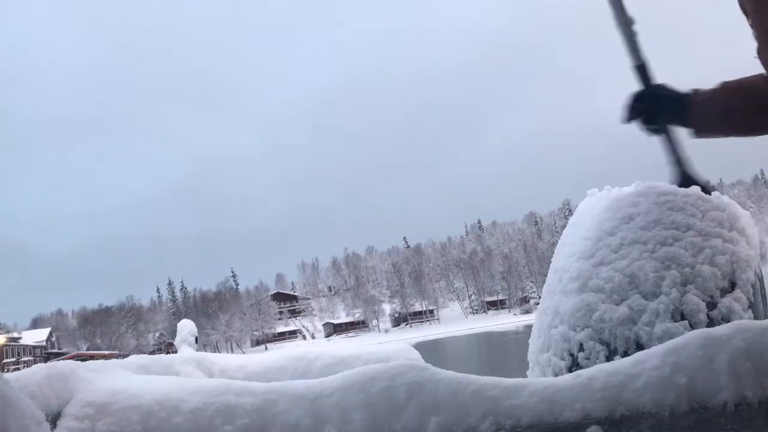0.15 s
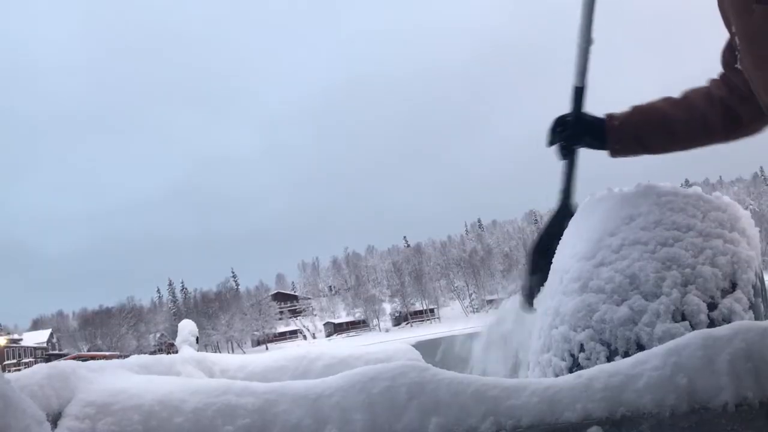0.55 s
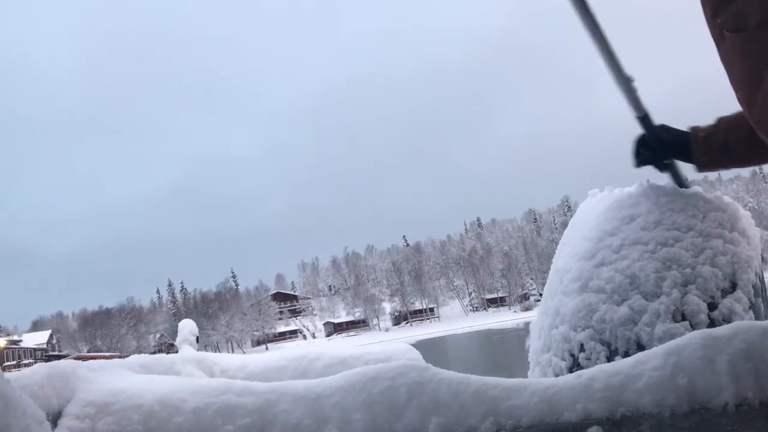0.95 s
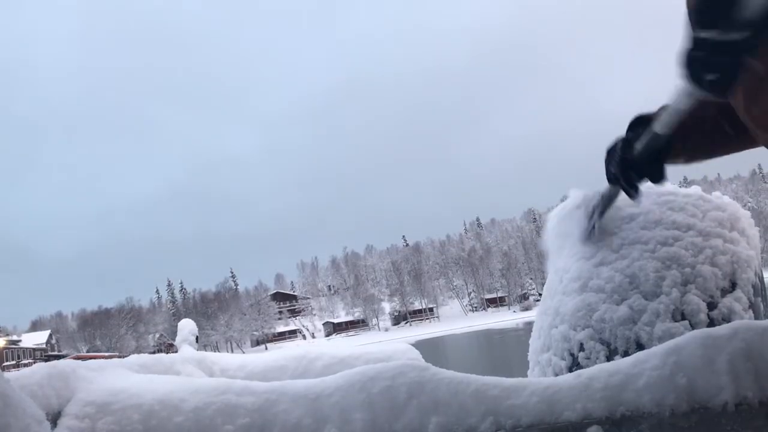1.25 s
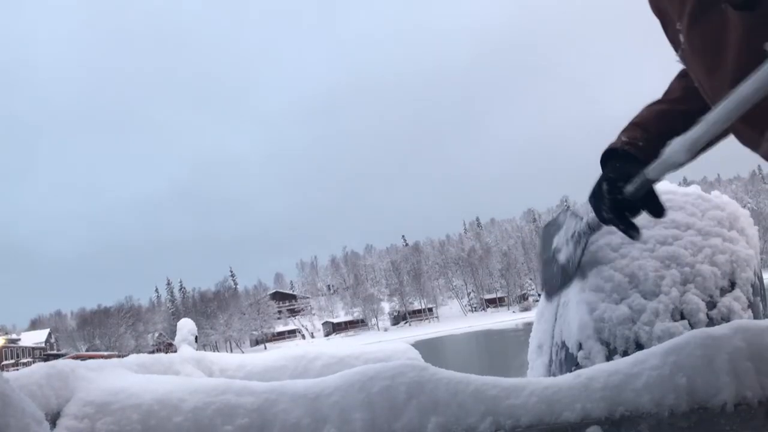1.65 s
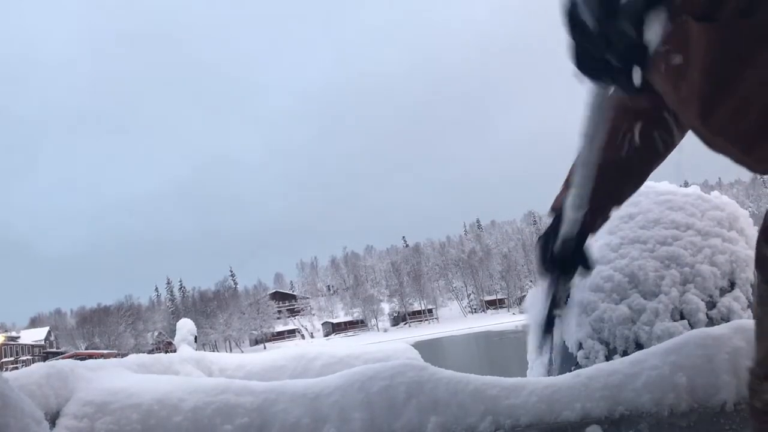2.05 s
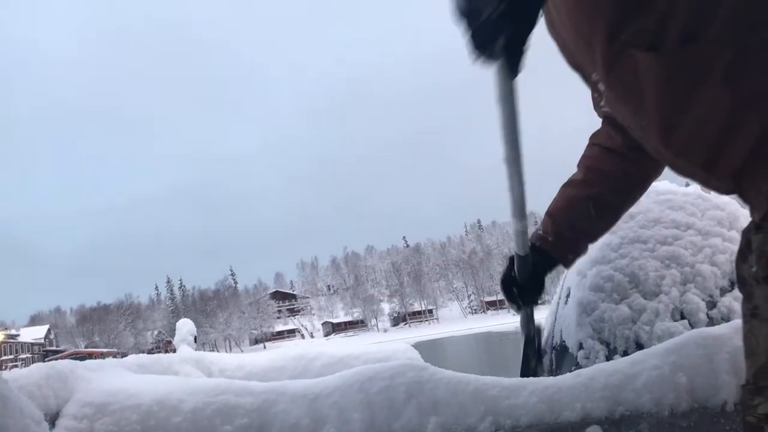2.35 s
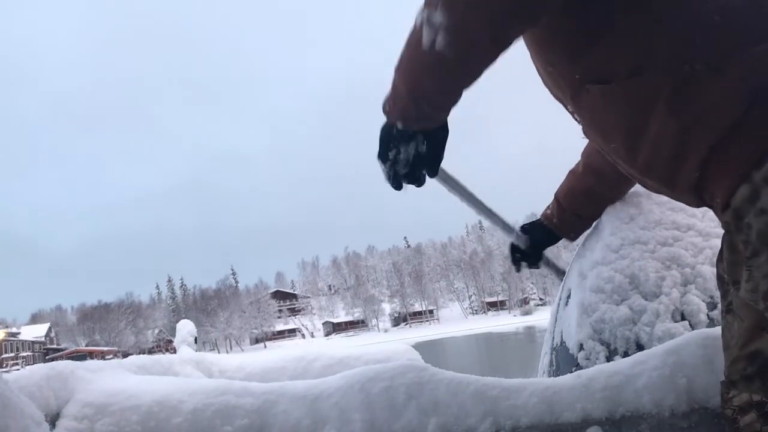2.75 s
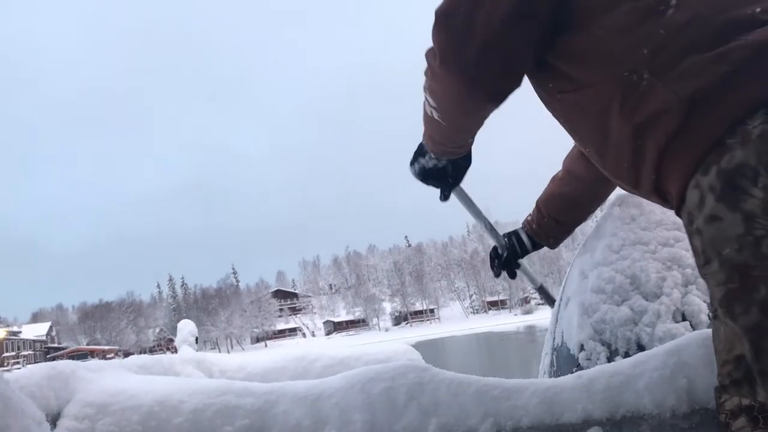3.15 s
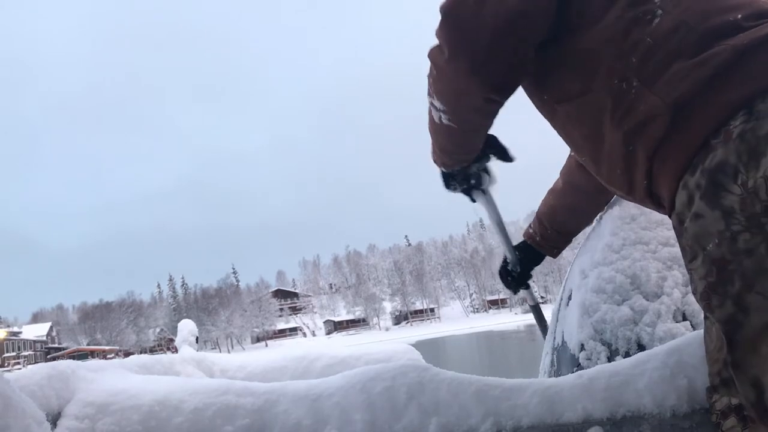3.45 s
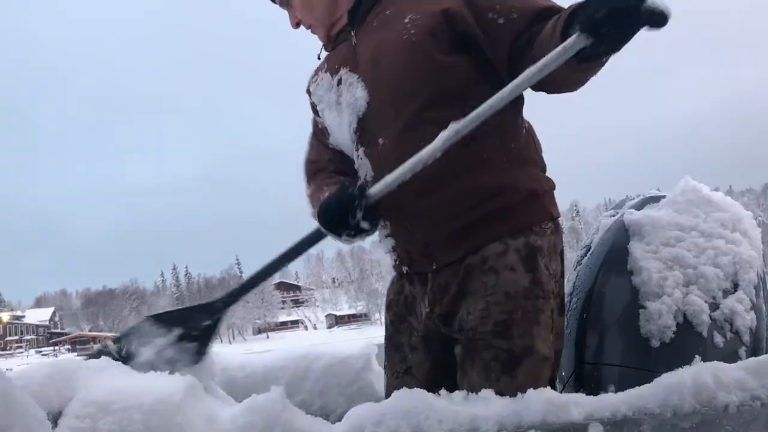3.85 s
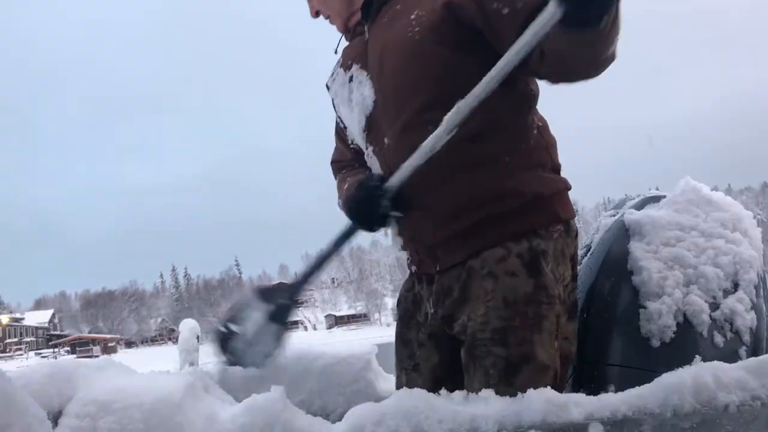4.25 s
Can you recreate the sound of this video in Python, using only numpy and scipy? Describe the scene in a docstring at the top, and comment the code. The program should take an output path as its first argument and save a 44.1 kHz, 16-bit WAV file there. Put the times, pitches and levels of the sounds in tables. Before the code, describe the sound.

A close, dry outdoor sound of a plastic shovel clearing deep snow from a boat. It opens nearly quiet, with a faint air wash and a soft low thud. At about 0.2 s the blade bites with sharp, crackling crunches, followed by a knock and several soft thumps near 0.4 s. Short crunches come at 0.6 and 0.85 s. From 1.2 s a longer scrape swells to a hard bite near 1.45 s, with a faint deep hull boom. A heavy thud and knock land at 1.67 s. Crunching and sliding snow return around 2.0 s, then a brief even judder at 2.25 s and another scrape to 2.5 s. It thins out, broken by a crisp bite at 3.04 s, then grows quiet. At 3.73 s a strong scoop hisses with fine powder; a crunch, knock and thuds follow at 4.03 s, then smaller scrapes. A barely audible thin whine stays beneath.

```python
"""A faint wash of air, a soft low thud and a murmur of snow come first, then a shovel bites in with a crunch.
A plastic blade clears deep fresh snow off a boat beside a still lake: small slips crackle and ring in it,
powder hisses, the edge knocks, and loosened snow slides off and lands in soft thuds.
Clicks and noise feed resonances and coloured bands; decaying sines make the thuds and knocks.
A few very short reflections surround the crunch, with no late echo."""
import sys
import numpy as np
from scipy import signal
from scipy.fft import rfft, irfft
from scipy.io import wavfile
from scipy.ndimage import uniform_filter1d

SR = 44100
rng = np.random.default_rng(int(sys.argv[2]) if len(sys.argv) > 2 else 0)


def put_to_file(sound):
    """Save the sound as 16-bit audio at rate SR, in the file named by the first command-line argument."""
    columns = np.atleast_2d(sound).T  # one column per channel
    safe = np.clip(columns, -1, 1)
    whole_steps = np.round(safe * 32767)
    wavfile.write(sys.argv[1], SR, whole_steps.astype(np.int16))


N = 193881
TIME = np.arange(N) / SR

# Event levels are relative: each source has its own trim. Swell is the rise over a push (negative: a fall).
# Blade pushing through snow: t/s, length/s, final level/dB, swell/dB, release t60/s,
# powder relative level/dB, loaded blade f/Hz, hollow body relative level/dB
STROKES = [ (0.0, 0.041, -59.5, 1, 0.4, -16, 905, 6), (0.075, 0.067, -69.5, -8.5, 0.33, 12, 1200, -13),
           (0.214, 0.061, -25, 0, 0.23, -9.5, 940, -18.5), (0.294, 0.038, -29.5, -1, 0.12, -13, 900, -5),
           (0.586, 0.014, -35, -4.5, 0.19, -6.5, 1410, -13), (0.86, 0.01, -38.5, 2, 0.14, -11, 980, 2),
           (0.986, 0.042, -39, 1.5, 0.54, -6.5, 1100, -9.5),
           (1.09, 0.059, -33, 5.5, 0.41, -5.5, 1080, -5.5), (1.214, 0.26, -27.5, 7.5, 0.3, -4, 1120, -12),
           (1.575, 0.1, -62.5, -7.5, 0.25, 12, 1410, -5), (1.682, 0.064, -36, 8, 0.3, -4, 930, -10),
           (1.821, 0.025, -36.5, 0, 0.26, -7.5, 1160, -5.5), (1.94, 0.033, -53.5, 5, 0.1, 5, 1200, -16),
           (1.978, 0.041, -36.5, 5, 0.19, -5, 1170, -27), (2.013, 0.13, -32, 3, 0.35, -3.5, 1170, -13),
           (2.355, 0.11, -35, 5.5, 0.37, 1, 1450, -12), (2.505, 0.037, -45, -10, 0.38, 3.5, 1140, 4.5),
           (2.637, 0.036, -53.5, -4, 0.23, 4.5, 1080, -4.5), (2.755, 0.1, -53.5, 14.5, 0.68, 6, 1100, -4),
           (2.892, 0.133, -44, 13, 0.2, 3, 1150, -3), (3.047, 0.029, -36.5, -9.5, 0.21, -34, 1140, 1),
           (3.212, 0.24, -56, 3.5, 0.23, -4.5, 1420, -7.5), (3.507, 0.24, -68, 6, 0.22, 2, 1250, -4),
           (3.742, 0.16, -30, 5.5, 0.13, -2.5, 1260, -8.5),
           (3.938, 0.076, -45.5, -5.5, 0.1, -7.5, 1220, -2), (4.031, 0.028, -36, -5, 0.18, -8.5, 1200, -13),
           (4.197, 0.038, -37, 11, 0.35, -13, 1160, -8), (4.328, 0.065, -43, 12, 0.2, 1, 1330, -32), ]
# Loose snow shoved along and sliding off: t/s, length/s, final level/dB, swell/dB, release t60/s, shoved f/Hz
SLIDES = [ (0.0, 0.015, -42, -18, 0.29, 164), (0.193, 0.14, -27, 11.5, 0.56, 270),
          (0.566, 0.035, -32.5, 25, 0.14, 370), (0.874, 0.005, -31.5, 0, 0.27, 312),
          (1.0, 0.17, -42.5, 2, 0.39, 297), (1.3, 0.14, -29, 16, 0.36, 217),
          (1.671, 0.037, -34.5, -6.5, 0.45, 202), (1.825, 0.014, -28, -6, 0.3, 254),
          (1.996, 0.17, -24, 21.5, 0.32, 323), (2.294, 0.14, -35.5, 10, 0.24, 198),
          (2.424, 0.1, -40, 2.5, 0.32, 353), (2.78, 0.27, -57.5, -0.5, 0.22, 256),
          (3.039, 0.037, -23.5, 7, 0.24, 225), (3.233, 0.022, -44, -15, 0.77, 178),
          (3.73, 0.18, -24.5, 12, 0.4, 181), (4.04, 0.028, -38, -12, 0.5, 175),
          (4.204, 0.055, -38, 3, 0.28, 190), ]
# Lumps landing and the blade bumping the hull: t/s, level/dB, nominal f/Hz, t60/s
THUDS = [(0.007, -35, 110, 0.19), (0.307, -19.5, 287, 0.069), (0.381, -14, 200, 0.098),
         (0.435, -20.5, 166, 0.081), (0.876, -22, 321.4, 0.12), (1.668, -10.5, 174.4, 0.098),
         (1.693, -13.5, 154, 0.044), (2.161, -27.5, 316, 0.18), (2.23, -19.5, 176.5, 0.079),
         (2.25, -29.5, 133, 0.11), (2.323, -24.5, 160, 0.08), (2.371, -22.5, 218, 0.091),
         (2.788, -41, 120, 0.088), (3.054, -26, 252, 0.082), (3.237, -30, 150, 0.13),
         (3.869, -19, 144, 0.23), (4.047, -20.5, 146.7, 0.21), (4.095, -20.5, 135, 0.057)]
# Finest dust flung from the blade: t/s, length/s, final level/dB, swell/dB, release t60/s
SPRAY = [(0.078, 0.14, -57, 2, 0.33), (0.39, 0.094, -65.5, -7, 0.13), (0.57, 0.043, -47, 0, 0.27),
         (1.755, 0.06, -46, -7, 0.55), (2.775, 0.31, -55, 0, 0.29), (3.742, 0.2, -33, 10, 0.3),
         (4.02, 0.006, -26, 2, 0.11), (4.05, 0.0074, -36.5, 0, 0.16), (4.21, 0.055, -45, -4, 0.88)]
# Edge biting through crust: t/s, level/dB, powder relative level/dB, t60/s
BITES = [(0.176, -8, -11, 0.037), (0.2, -6.5, -17.5, 0.047), (0.215, -10, -10.5, 0.05),
         (0.323, -11, -18, 0.081), (0.575, -12.5, -11.5, 0.022), (0.59, -15.5, -11, 0.062),
         (0.652, -19.5, -13, 0.024), (0.778, -41.5, -2.5, 0.028), (0.84, -22, -17, 0.055),
         (0.867, -18.5, -13, 0.036), (0.987, -32, -7.5, 0.05), (1.142, -16, -9.5, 0.081),
         (1.451, -4.5, -33, 0.04), (1.679, -16.5, -6, 0.026), (1.694, -12, -11.5, 0.055),
         (1.978, -25, -7.5, 0.03), (2.023, -22, -3.5, 0.045), (2.063, -11, -24, 0.072),
         (2.364, -32.5, 7.5, 0.055), (2.466, -12, -9.5, 0.036), (2.947, -25.5, -2, 0.05),
         (3.0, -22, -5.5, 0.026), (3.041, -8, -26, 0.029), (3.729, -16.5, -35, 0.22),
         (4.024, -12, -16, 0.057), (4.051, -9, -18, 0.028), (4.293, -20.5, -9.5, 0.013)]
# Hard knocks of the blade: t/s, level/dB, struck f/Hz, t60/s, spread of struck modes/octaves
KNOCKS = [(0.393, -14, 1090, 0.032, 0.098), (0.653, -32.5, 1600, 0.09, 0.16),
          (0.841, -28.5, 910, 0.062, 0.32), (1.67, -21.5, 660, 0.053, 0.12),
          (1.829, -27, 1140, 0.041, 0.19), (3.042, -28, 660, 0.15, 1.9), (4.026, -17.5, 1190, 0.04, 0.24)]
# Modes that ring in a knock: f/Hz, relative level/dB, share of the knock's t60
KNOCK_MODES = [(632, 8, 0.99), (910, 10.5, 1), (1230, 7, 0.77), (1373, 3, 1.0), (1580, 4, 1.0),
               (1910, 0, 0.97), (2200, 3, 0.98), (2260, 17.5, 0.31), (2627, -38, 0.64), (3240, -1, 0.28)]
# Blade rubbing over the booming hull: t/s, length/s, final level/dB, swell/dB, release t60/s
HULL_RUBS = [(1.28, 0.17, -40, 3, 0.26), (1.835, 0.07, -39.5, -2, 0.2), (2.0, 0.24, -48.5, 8, 0.43)]
# Resonances of the rubbing blade: f/Hz, width/Hz, relative level/dB
BLADE_MODES = [(917, 80, -10.5), (1817, 60, -6.5), (2366, 130, -5), (3084, 25, -6), (5060, 27, -51),
               (5790, 280, -16.5)]
# Short paths off the hull and the back of the blade: nominal lag/s, gain
MIRRORS = [(0.0013, 0.22), (0.0034, 0.39)]

# Spectra of air, snapping snow, hollow body, powder, low rumble and fine dust: f/Hz, relative level per Hz/dB
AIR_SPECTRUM = [(15, -39), (25, 10.5), (108, 5), (263, -3.5), (363, -1), (463, -7.5), (1650, -8.5),
                (5730, -18), (10400, -26), (14400, -18.5), (16000, -30)]
CRUNCH_SPECTRUM = [(410, -19), (700, -6), (790, -11.5), (939, 1), (1070, -3.5), (1780, -6.5), (2080, -10.5),
                   (2440, -9), (3600, -13), (5500, -14), (7150, -48), (12100, -120)]
HOLLOW_SPECTRUM = [(330, 27.5), (430, -22.5), (530, 0), (640, 8), (800, -20)]
POWDER_SPECTRUM = [(2470, -10.5), (4200, 1), (4900, -5), (5820, 6), (7660, -2), (8690, 0), (15100, -9.5),
                   (16200, -17), (16500, -46)]
RUMBLE_SPECTRUM = [(28, -30), (45, -0.5), (85, 2.5), (160, 4.5), (300, -2), (600, -11.5)]
DUST_SPECTRUM = [(7000, 8), (9500, 1.5), (12000, 4), (15000, 3), (16300, -3)]

AIR_DB, CUTOFF_HZ, HULL_HZ = -60.5, 16200, 88.9
WHINE_HZ, WHINE_DB, WHINE_FROM_S = 2948, -70.5, 0.62
ATTACK_S = 0.005  # every push takes hold quickly
TRICKLE_DB, TRICKLE_T60_S = -18.5, 0.27  # powder still trickling after it breaks loose
SINK_OCTAVES, SINK_S = 0.88, 0.27  # pitch drop of a slide once the blade lets it go
# drawn back, the edge judders in an even run of small bites; levels are relative like those of BITES
JUDDER_FROM_S, JUDDER_GAP_S, JUDDER_T60_S = 2.227, 0.0235, 0.06
JUDDER_DB, JUDDER_POWDER_DB = -25, -7.5


def from_db(db):
    """Decibels to gain."""
    return 10 ** (np.asarray(db) / 20)


def rms_one(x):
    """Scale to unit power."""
    return x / np.sqrt(np.mean(x ** 2) + 1e-20)


def fade(age, t60):
    """Exponential decay by 60 dB in t60 seconds, held at full level before age zero."""
    return np.exp(-np.minimum(np.log(1000) * np.maximum(age, 0) / t60, 20))


def hiss():
    """White noise."""
    return rng.standard_normal(N)


def colour(draw, spectrum):
    """Third-octave bands, neighbours fed by unrelated draws, weighted by a spectrum; unit power gain."""
    hz, db = np.transpose(spectrum)
    edge_count = int(3 * np.log2(hz[-1] / hz[0])) + 2
    edges = np.geomspace(hz[0], min(hz[-1], .45 * SR), edge_count)
    log_centres = np.log(edges[:-1] * edges[1:]) / 2
    gains = from_db(np.interp(log_centres, np.log(hz), db))
    feeds, out = [draw(), draw()], 0
    for k, gain in enumerate(gains):
        band = signal.butter(2, edges[k:k + 2], "band", fs=SR, output="sos")
        out = out + gain * signal.sosfilt(band, feeds[k % 2] + 1e-18)
    return out / np.sqrt(np.sum(gains ** 2 * np.diff(edges)) * 2 / SR)


def still_air():
    """A faint wash of distant noise."""
    return from_db(AIR_DB) * colour(hiss, AIR_SPECTRUM)


def resonate(x, hz, width_hz):
    """A two-pole resonance of gain 1 whose centre may move, stepped in short blocks."""
    r = np.exp(-np.pi * width_hz / SR)
    out, state = np.zeros(N), np.zeros(2)
    step = 128 if np.ndim(hz) else N
    w = 2 * np.pi * np.broadcast_to(hz, N) / SR
    for i in range(0, N, step):
        poles = [1, -2 * r * np.cos(w[i]), r * r]
        out[i:i + step], state = signal.lfilter([1, 0, -1], poles, x[i:i + step] + 1e-18, zi=state)
    return out * (1 - r * r) / 2


def grains(per_s, spread_db):
    """Random clicks of either sign, their levels spread exponentially; unit power."""
    sizes = from_db(spread_db * np.minimum(rng.exponential(1, N), 3.5))
    signs = rng.choice([-1, 1], N)
    return rms_one(sizes * signs * (rng.random(N) < per_s / SR))


def slips(per_s, spread_db, t60, steady):
    """Snow gives way in jerks: each frees force at once and dies away, while the arm keeps the mean drag even."""
    keep = from_db(-120 / (t60 * SR))
    power = signal.lfilter([1], [1, -keep], grains(per_s, spread_db) ** 2)
    power = power / power.mean() + abs(steady)
    return np.sqrt(power / uniform_filter1d(power, size=SR // 25))


def push(s, length_s, db, swell_db, t60):
    """Envelope of one push: a quick attack, a steady swell up to its final level, then a release."""
    age = TIME - s
    level_db = db - swell_db * np.clip(1 - age / length_s, 0, 1)
    return np.clip(age / ATTACK_S, 0, 1) * from_db(level_db) * fade(age - length_s, t60)


def pushes(rows):
    """The joint level of a table of pushes in dB, and each one's share of the power at every moment."""
    powers = np.array([push(*row[:5]) for row in rows]) ** 2 + 1e-14
    total = powers.sum(axis=0)
    return 10 * np.log10(total), powers / total


def trickle(power):
    """Freed powder goes on falling faintly for a while."""
    keep = np.exp(-2 * np.log(1000) / (TRICKLE_T60_S * SR))
    return from_db(TRICKLE_DB) ** 2 * signal.lfilter([1 - keep], [1, -keep], power)


def breaking(level_db, powder_db, jerks):
    """Power freed in coarse grains and in fine powder: the jerky drag of the stroke plus the bites."""
    coarse = (from_db(level_db) * jerks) ** 2
    fine = (from_db(level_db + powder_db - 2.5) * jerks) ** 2
    bite_coarse, bite_fine = bites()
    coarse = coarse + bite_coarse
    fine = fine + bite_fine
    return coarse + trickle(coarse), fine + trickle(fine)


def squeaks(power, per_s, cycles, spread_db):
    """Packed crystals shear in tiny chirps, each ringing briefly at a pitch of its own."""
    pitches = np.geomspace(800, 7500, num=44)
    dealt = rng.integers(0, len(pitches), N)  # which pitch each click excites
    clicks = np.sqrt(power) * grains(per_s, spread_db)
    weights = from_db(np.interp(pitches, *np.transpose(CRUNCH_SPECTRUM)))
    widths = np.log(1000) / np.pi * pitches / cycles
    out = sum(weights[k] * resonate(clicks * (dealt == k), hz, widths[k]) for k, hz in enumerate(pitches))
    return rms_one(out) * np.sqrt(power.mean())


def rasp(coarse, blade_hz, freedom):
    """Coarse grains snap and chirp, and set the plastic ringing as far as it is free to flex."""
    force = np.sqrt(coarse)

    def snapping():
        """Large and small crystals break out of step, so the colour shifts from slip to slip."""
        jerks = slips(per_s=550, spread_db=1.5, t60=0.073, steady=1.0)
        return force * jerks * grains(per_s=8300, spread_db=0.0)

    snaps = colour(snapping, CRUNCH_SPECTRUM)
    drive = force * grains(per_s=3400, spread_db=0.5)
    ringing = sum((-1) ** k * from_db(db) * resonate(drive, hz, width)
                  for k, (hz, width, db) in enumerate(BLADE_MODES))
    flex = resonate(force * hiss(), blade_hz, width_hz=230)  # snow on the blade shifts its main mode
    chirps = squeaks(coarse, per_s=1100, cycles=90, spread_db=2.5)
    return from_db(-5) * snaps + from_db(12.5) * ringing + from_db(13) * freedom * flex + from_db(-5) * chirps


def muffle(x, openness, edge_hz, grip):
    """A buried blade loses its treble; a free one keeps or brightens it."""
    low = signal.sosfiltfilt(signal.butter(2, edge_hz, fs=SR, output="sos"), x)
    return low + (x - low) * np.minimum(openness ** grip, 1.5)


def hollow_body(level_db, jerks):
    """The jerky drag drives low, boxy bands with dense grains."""
    return from_db(level_db - 1.5) * jerks * colour(lambda: grains(per_s=3800, spread_db=7.0), HOLLOW_SPECTRUM)


def powder_hiss(fine, looseness):
    """Fine grains hiss, and dry snow skates over the plastic in a narrow high band."""
    powder = colour(lambda: np.sqrt(fine) * grains(per_s=10000, spread_db=-1.0), POWDER_SPECTRUM)
    sifting = np.sqrt(fine) * looseness * rms_one(resonate(hiss(), hz=6200, width_hz=550))
    return from_db(0.5) * powder + from_db(-2) * sifting


def wander(width_hz):
    """A slow random swing of unit power."""
    white = rfft(hiss())
    hz = np.arange(len(white)) * SR / N
    return rms_one(irfft(white * np.exp(-(hz / width_hz) ** 2), N))


def nearby_surfaces(x, sway):
    """Early reflections ripple the spectrum; their paths change as the shovel moves."""
    out = x
    for lag_s, gain in MIRRORS:
        moving_lag_s = lag_s * np.exp(sway * wander(width_hz=1.134))
        out = out + gain * np.interp(TIME - moving_lag_s, TIME, x)
    return out / np.sqrt(1 + sum(gain ** 2 for _, gain in MIRRORS))


def crunch():
    """The blade breaks the snow: a rasp over a hollow body, with powder hissing above."""
    level_db, shares = pushes(STROKES)
    powder_db, blade_hz, hollow_db = np.transpose(STROKES)[5:] @ shares
    jerks = slips(per_s=380, spread_db=2.5, t60=0.016, steady=0.49)
    coarse, fine = breaking(level_db, powder_db, jerks)
    looseness = fine / (fine + coarse)
    # loose snow hardly bends the blade, and pressing it on the hull stops it flexing
    freedom = from_db(-3 * looseness) / np.hypot(1, from_db(hollow_db - 5))
    openness = from_db(11) * np.sqrt(fine / coarse)
    blade = muffle(rasp(coarse, blade_hz, freedom), openness, edge_hz=1930, grip=0.4)
    hollow = hollow_body(level_db + hollow_db, jerks)
    return nearby_surfaces(blade + hollow + powder_hiss(fine, looseness) + spray(jerks), sway=0.143)


def sinking(hz, let_go_s):
    """Pitch of a slide: steady while shoved, then settling lower."""
    return hz * 2 ** (SINK_OCTAVES * np.expm1(-np.maximum(TIME - let_go_s, 0) / SINK_S))


def sliding_snow():
    """Tumbling lumps make a hollow mutter with a rumble under it."""
    level_db, shares = pushes(SLIDES)
    pitch_hz = sum(share * sinking(hz, s + length_s)
                   for share, (s, length_s, *_, hz) in zip(shares, SLIDES))
    tumbling = resonate(grains(per_s=900, spread_db=2.0), pitch_hz, width_hz=82)
    mutter = rms_one(resonate(tumbling, pitch_hz, width_hz=135))
    rumble = colour(lambda: grains(per_s=1100, spread_db=-2.0), RUMBLE_SPECTRUM)
    return from_db(level_db) * (from_db(-9) * mutter + from_db(-11.5) * rumble)


def burst(start, rise_s, t60):
    """Envelope of one blow: a quick rise, then an exponential decay."""
    age = np.maximum(TIME - start, 0)
    return np.minimum(age / rise_s, 1) * fade(age - rise_s, t60)


def thuds(sag=0.15, settle_s=0.022):
    """Each lump gives a few low cycles that sink in pitch as it packs, and a dull puff."""
    tone, puff = np.zeros(N), np.zeros(N)
    for s, db, hz, t60 in THUDS:
        age = np.maximum(TIME - s, 0)
        pitch_hz = hz * (1 + sag * (np.exp(-age / settle_s) - .7))
        blow = from_db(db) * burst(s, rise_s=0.0029, t60=t60)
        tone += blow * np.sin(2 * np.pi * np.cumsum(pitch_hz * (age > 0)) / SR)
        puff += blow
    return from_db(-5.5) * tone + from_db(-16) * colour(lambda: puff * hiss(), RUMBLE_SPECTRUM)


def spray(jerks):
    """The finest dust, flung from the blade, spits in the top treble."""
    level_db, _ = pushes(SPRAY)
    return from_db(level_db - 6) * jerks * colour(lambda: grains(per_s=5700, spread_db=11.0), DUST_SPECTRUM)


def bites():
    """The edge breaks crust in sharp bursts of coarse and fine power."""
    coarse, fine = 0, 0
    for s, db, powder_db, t60 in BITES + judder(count=6):
        bite = (from_db(db - 15) * burst(s, rise_s=0.00099, t60=t60)) ** 2
        coarse = coarse + bite
        fine = fine + bite * from_db(powder_db + 5) ** 2
    return coarse, fine


def knocks():
    """The blade meets something hard: modes near the struck pitch ring most, and clinging snow damps them."""
    out = np.zeros(N)
    strengths_db = rng.normal(0, 1.0, (len(KNOCKS), len(KNOCK_MODES)))
    for (s, db, struck_hz, t60, spread_oct), own_db in zip(KNOCKS, strengths_db):
        first = int(s * SR)
        age = TIME[:N - first][:SR // 2]
        for k, ((hz, mode_db, share), extra_db) in enumerate(zip(KNOCK_MODES, own_db)):
            nearness = 1 / np.hypot(1, np.log2(hz / struck_hz) / spread_oct)
            gain = (-1) ** k * from_db(db + mode_db + extra_db - 12.5) * nearness
            decay = np.exp(-np.log(1000) * age / (t60 * share))
            out[first:first + len(age)] += gain * decay * np.sin(2 * np.pi * hz * age)
    return out


def whine():
    """A thin steady sine fades in, far quieter than the shovel."""
    fade_in = np.clip(20 * (TIME - WHINE_FROM_S), 0, 1)
    return from_db(WHINE_DB) * np.sqrt(2) * np.sin(2 * np.pi * WHINE_HZ * TIME) * fade_in


def hull():
    """The hollow shell answers the rubbing with one deep mode."""
    level_db, _ = pushes(HULL_RUBS)
    boom = resonate(resonate(hiss(), HULL_HZ, width_hz=4.6), HULL_HZ, width_hz=7.1)
    return from_db(level_db) * rms_one(boom)


def judder(count):
    """The edge sticks and slips at an even pace; rows as for the bites."""
    return [(JUDDER_FROM_S + k * JUDDER_GAP_S, JUDDER_DB, JUDDER_POWDER_DB, JUDDER_T60_S)
            for k in range(count)]


def scene():
    """All sources at one close microphone."""
    air = still_air() + whine()
    return (crunch() + sliding_snow() + thuds() + knocks() + hull() + air)[None]


def record(dry):
    """The microphone sheds the deepest bass, and the top is cut steeply."""
    thinned = signal.sosfilt(signal.butter(2, 32, "high", fs=SR, output="sos"), dry)
    return signal.sosfilt(signal.ellip(10, .1, 80, CUTOFF_HZ, fs=SR, output="sos"), thinned)


dry = scene()
out = record(dry)
put_to_file(out)
```